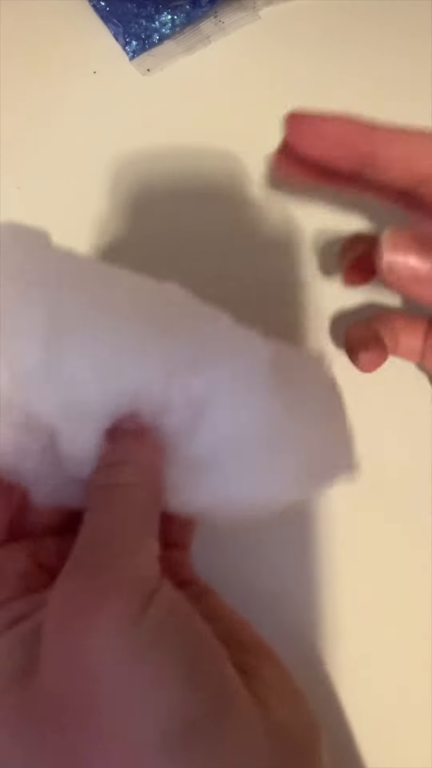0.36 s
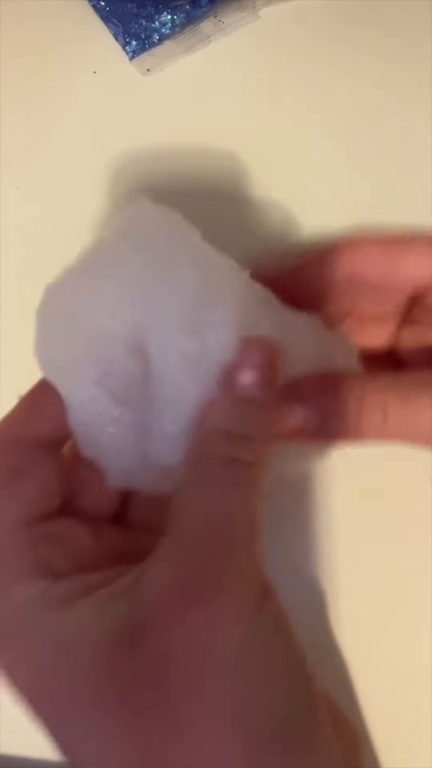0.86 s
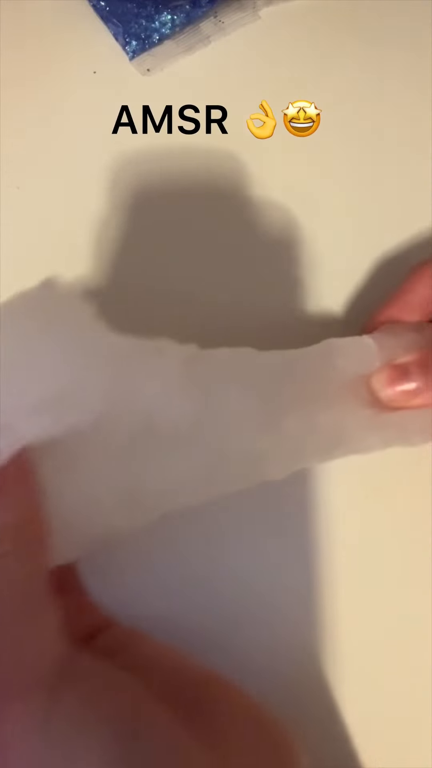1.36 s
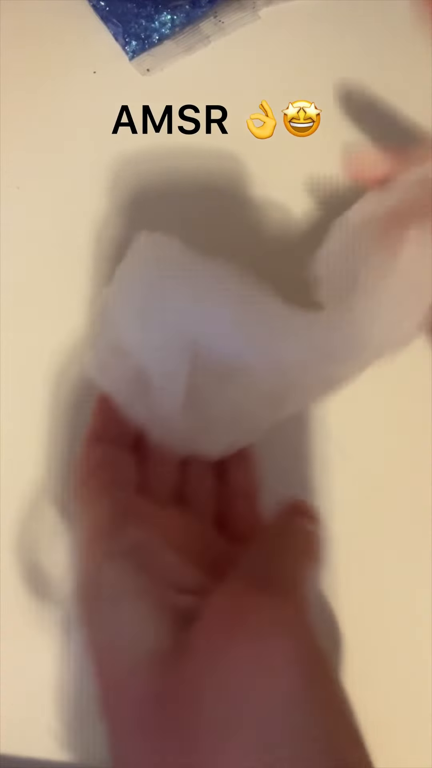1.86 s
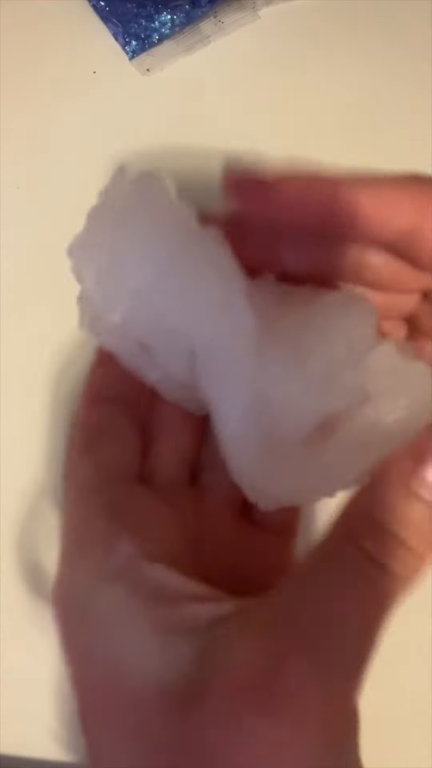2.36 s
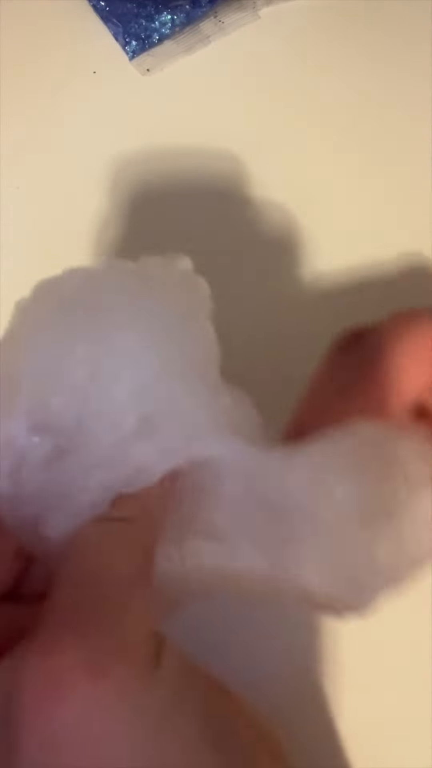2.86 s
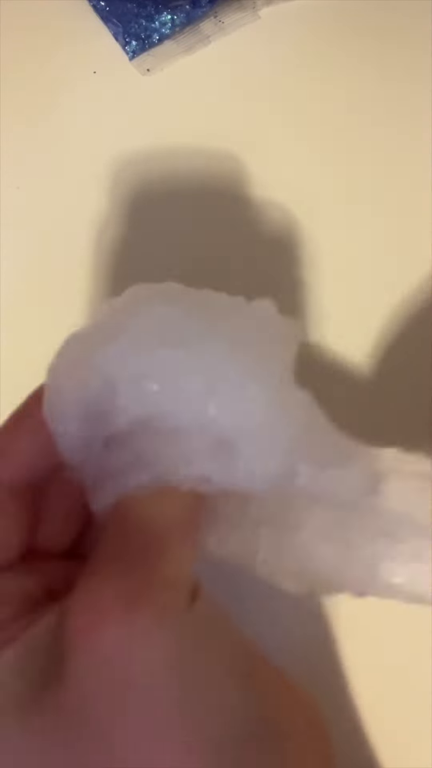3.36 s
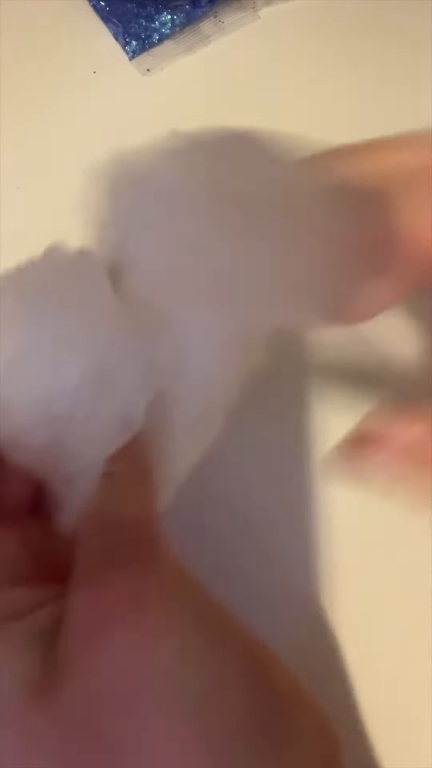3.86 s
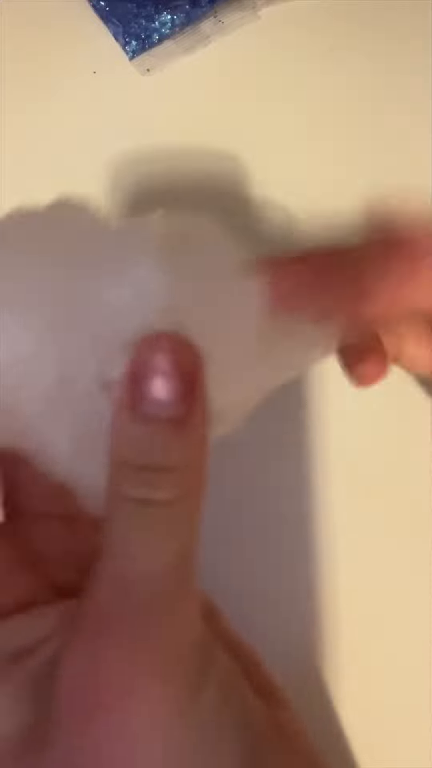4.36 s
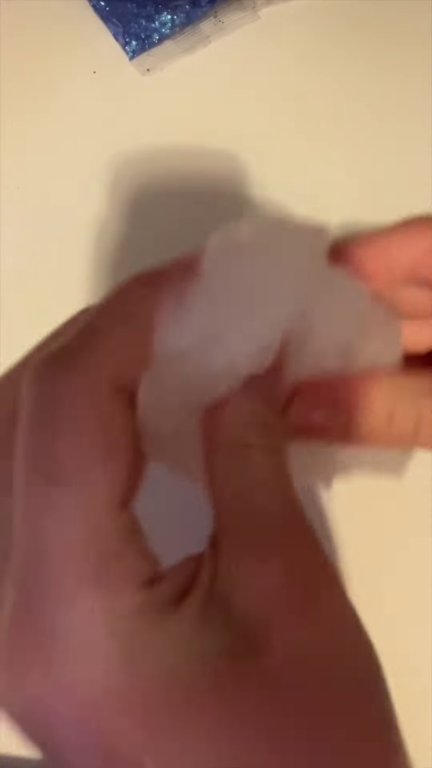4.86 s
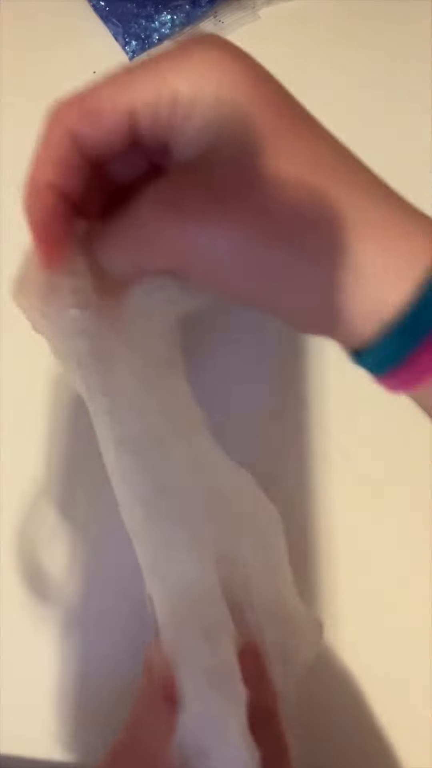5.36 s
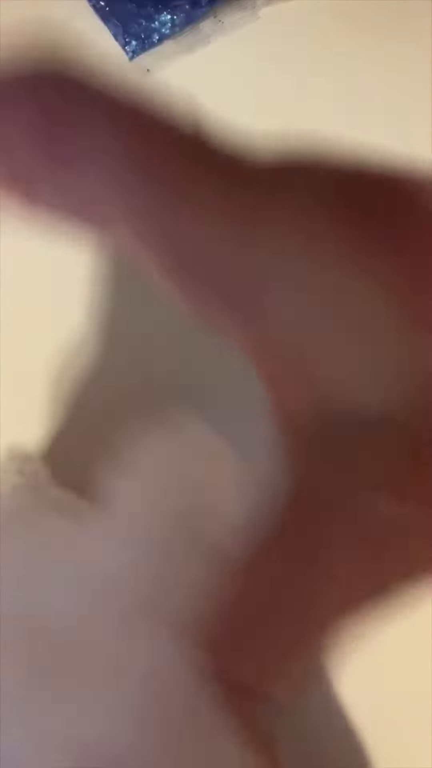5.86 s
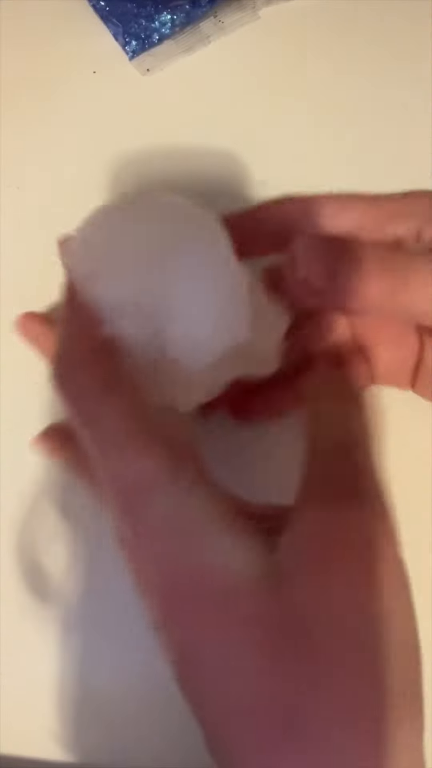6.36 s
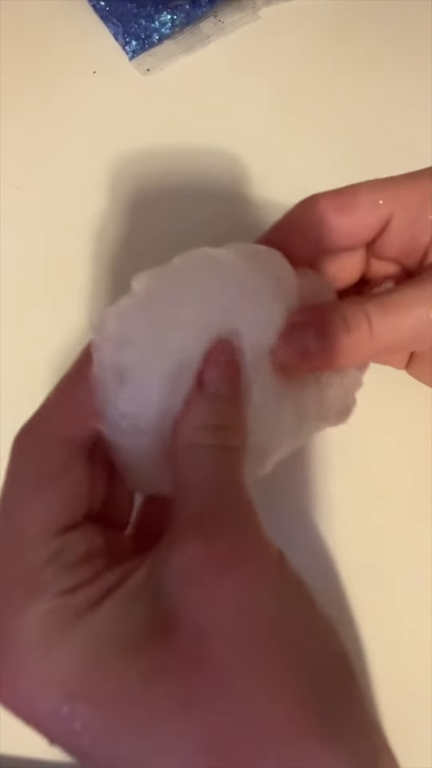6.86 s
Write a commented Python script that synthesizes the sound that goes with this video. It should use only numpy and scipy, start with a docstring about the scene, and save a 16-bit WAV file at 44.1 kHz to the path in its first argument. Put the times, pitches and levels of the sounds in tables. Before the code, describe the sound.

Close, dry and crisp: thin slime films snap brightly while trapped air pockets pop lower, each squeeze trailing a fine crackle. It starts scattered, becomes thick and continuous for about a second around three seconds, eases, swells again at five and dwindles to isolated clicks. Soft hand knocks on a table occur now and then, with a late tap and dull rumble. The small room is quiet, with a low hum and faint hiss.

```python
"""In a quiet room, two hands stretch and fold bubbly slime just above a table, close to a two-port microphone.
Thin films snap brightly and trapped air pockets pop lower: short tones at listed pitches, torn by noise.
A fine crackle of random clicks, rung by films and pockets alike, follows each squeeze of the lump.
Now and then a hand knocks the table and rings its modes; once a nail taps and the table shudders.
A swelling hum, a steady rumble and faint hiss lie behind, made of a wavering sine and shaped noise."""
import sys
import numpy as np
from scipy import signal
from scipy.fft import rfft, irfft, next_fast_len
from scipy.io import wavfile

SR = 44100
rng = np.random.default_rng(int(sys.argv[2]) if len(sys.argv) > 2 else 0)


def gain_from_db(level_db):
    """Turn a decibel level (scalar or array-like) into a linear amplitude factor."""
    decades = np.asarray(level_db, float) / 20
    return 10 ** decades


def transcribe(u):
    """Save the signal u as a 16-bit wav file named by the first command-line argument.

    u: samples, shape (n,) or (channels, n), limited to [-1, 1]; the rate is SR.
    q: integer samples, one column per channel.
    """
    v = np.clip(np.atleast_2d(u).T, -1, 1)
    q = np.round(v * 32767).astype(np.int16)
    wavfile.write(sys.argv[1], SR, q)


N = 308259   # length in samples

OPPOSITE = np.array([[1], [-1]])   # left and right in opposite sense
TABLE_UNLIKE = 0.4   # share of the table's motion that differs between the ports


def rms_one(x):
    """Scale to rms 1."""
    return x / np.sqrt(np.mean(x ** 2) + 1e-20)


def at_hz(points, hz):
    """Read a spectrum of (Hz, value) points on a log-frequency axis."""
    point_hz, values = np.array(points).T
    return np.interp(np.log(hz), np.log(point_hz), values)


def coloured(x, spectrum):
    """Shape the last axis by a spectrum of (Hz, gain dB) points."""
    length = x.shape[-1]
    size = next_fast_len(length)
    hz = np.maximum(np.fft.rfftfreq(size, 1 / SR), 1)
    return irfft(rfft(x, size) * gain_from_db(at_hz(spectrum, hz)), size)[..., :length]


def filtered(x, order, hz, kind="low"):
    """Butterworth filter."""
    return signal.sosfilt(signal.butter(order, hz, kind, fs=SR, output="sos"), x)


def drift(rate_hz):
    """Slow random wandering of rms 1: noise at 200 knots a second through a one-pole lowpass."""
    knots = rng.standard_normal(int(N / SR * 200) + 2)
    memory = np.exp(-2 * np.pi * rate_hz / 200)
    slow = rms_one(signal.lfilter([1], [1, -memory], knots))
    return np.interp(np.arange(N) * 200 / SR, np.arange(len(slow)), slow)


def ring(drive, hz, t60_s):
    """A two-pole resonance: a unit click sets a dying sine of starting height 1 ringing."""
    radius = gain_from_db(-60 / (t60_s * SR))
    angle = 2 * np.pi * min(hz, .45 * SR) / SR
    return signal.lfilter([0, np.sin(angle)], [1, -2 * radius * np.cos(angle), radius ** 2], drive + 1e-18)


def holds(rows, rise_db_per_s, fall_db_per_s):
    """Level in dB of gestures (start s, hold s, dB) that build, hold and die away; their powers add."""
    t = np.arange(0, N + 64, 64) / SR
    power = 1e-20
    for start_s, hold_s, db in rows:
        early = np.maximum(start_s - t, 0)
        late = np.maximum(t - start_s - hold_s, 0)
        power = power + gain_from_db(db - rise_db_per_s * early - fall_db_per_s * late) ** 2
    return np.interp(np.arange(N) / SR, t, 10 * np.log10(power))


def unlike(x):
    """The left-right difference: only the part below 6.6 kHz, in opposite sense; above it both sides stay
    alike."""
    return filtered(x, 6, 6600) * OPPOSITE


def room_tone():
    """A wavering hum that swells, coloured rumble partly shared by both ports, and faint hiss."""
    # swells of the hum: start_s (of the hold), hold_s, level_db (rms, before the waver)
    swells = [(0.0, 0.032, -80), (1.75, 0.31, -68), (1.85, 0.027, -61.5), (2.45, 0.81, -67.5),
              (6.62, 0.19, -69.5)]
    # colour of the rumble: frequency_hz, gain_db (relative)
    rumble_colour = [(15, -56), (25, -8.5), (60, 6), (124, 3), (165, -7.5), (345, -15.5), (619, -24),
                     (900, -35), (1170, -41.5), (1980, -120)]
    rumble_db, hiss_db, wide_hiss_db = -77.5, -74, -71   # both hiss levels are of the noise before shaping

    hum_hz = 74.5 + 1.5 * drift(14.0)
    waver = gain_from_db(2.0 * drift(4.6))
    hum = np.sqrt(2) * np.sin(2 * np.pi * np.cumsum(hum_hz) / SR) * waver
    hum_db = holds(swells, rise_db_per_s=120, fall_db_per_s=120)

    mid, side = coloured(rng.standard_normal((2, N)), rumble_colour)
    upper = filtered(mid, 4, [90, 300], "band")
    rumble = (mid + 0.63 * side * OPPOSITE) / np.std(upper)   # the level counts the shared part in 90-300 Hz

    white = rng.standard_normal((2, N))
    bright = coloured(white[0], [(1000, -13.0), (5000, -9.0), (11000, -5.5), (15500, -3.5), (16300, -34.0)])
    wide = unlike(filtered(white[1], 2, 700, "high"))
    return gain_from_db(hum_db) * hum + gain_from_db(rumble_db) * rumble + gain_from_db(hiss_db) * bright + gain_from_db(wide_hiss_db) * wide


def shudder():
    """After the last knock the low table resonances tremble unevenly, driven by the noise of a rough drag."""
    # low resonances of the table: frequency_hz, t60_s, level_db (relative rms)
    peaks = [(42, .25, -8), (70, .3, 0), (114, .3, -8), (185, .12, -22), (229, 2.5, -17), (330, .1, -26),
             (540, .05, -34)]
    shared_and_own = rng.standard_normal((len(peaks), 3, N))
    drag = shared_and_own[:, :1] + TABLE_UNLIKE * shared_and_own[:, 1:]
    out = sum(gain_from_db(db) * rms_one(ring(x, hz, t60_s)) for (hz, t60_s, db), x in zip(peaks, drag))
    # start s, hold s, rms dB
    level_db = holds([(6.25, 0.281, -55.5)], rise_db_per_s=499.5, fall_db_per_s=499.5)
    return gain_from_db(level_db) * rms_one(out)


def tap():
    """A nail taps something small: a click rings very briefly, and a noise-driven rattle rings on."""
    tap_s, tap_hz, rattle_t60_s = 6.2262, 950, 0.19
    t = np.maximum(np.arange(N) / SR - tap_s, 0)
    fade = gain_from_db(-10 - 60 * t / rattle_t60_s) * (t > 0)
    rattle = rms_one(ring(rng.standard_normal(N), tap_hz, .04)) * fade
    click = 1.0 * (np.arange(N) == round(tap_s * SR))
    return gain_from_db(-43) * (ring(click, tap_hz, .008) + rattle)


def knocks():
    """Fingertip, palm and a slap of skin set the table modes ringing; long contact is dull."""
    # hand on table: start_s, level_db (of the force), contact_s
    touches = [(0.717, -44, 0.00098), (1.809, -49.5, 0.0041), (3.96, -52.5, 0.0056), (6.223, -55, 0.0033)]
    # modes of the table top: frequency_hz, level_db (relative), t60_s
    modes = [(128, -7.5, 0.14), (178.2, -7, 0.074), (348, -3.5, 0.11), (380, -7.5, 0.23), (490, -6, 0.0501),
             (735, -9.5, 0.04)]
    fingertip_db, palm_late_s = -7, .008   # the fingertip lands before the palm
    slap_db, slap_t60_s = -26.5, 0.13   # noise of the skin
    thud_db = 3   # the force heard directly, beside the modes

    force = np.zeros(N + SR)
    t = np.arange(8192) / SR
    for (start_s, db, contact_s), noise in zip(touches, rng.standard_normal((len(touches), len(t)))):
        hits = gain_from_db(slap_db - 60 * t / slap_t60_s) * noise
        hits[0] += gain_from_db(fingertip_db)
        hits[round(palm_late_s * SR)] -= 1
        push = np.hanning(max(round(contact_s * SR), 4))
        at = round(start_s * SR)
        force[at:at + len(t)] += gain_from_db(db) * np.convolve(hits, 2 * push / push.sum())[:len(t)]
    force = force[:N]

    out = gain_from_db(thud_db) * force
    for k, (hz, mode_db, t60_s) in enumerate(modes):
        side = 1 + TABLE_UNLIKE * (-1) ** k * OPPOSITE   # modes lean left and right by turns
        out = out + gain_from_db(mode_db) * side * ring(force, hz, t60_s)
    return filtered(out, 3, 60, "high")


def rasps(count, size):
    """Rows of stereo noise, partly different at the ports as bubbles lie all over the lump."""
    mid, side = rng.standard_normal((2, count, 1, size))
    deep = filtered(side, 2, 800)   # the deep part differs most, the treble least
    return mid + 0.37 * unlike(side) + (0.13 * side + deep) * OPPOSITE


def scattered(count, scatter_db):
    """Left and right gains of bubbles at random places."""
    return gain_from_db(scatter_db * rng.uniform(-0.9, 1, (count, 1, 1)) * OPPOSITE)


def bursts(events, spectrum, cycles, tear_db, tear_t60, after_db, after_t60, scatter_db):
    """Each burst rings briefly at its own pitch, with a wide tearing click and a spray of tiny after-bursts."""
    out = np.zeros((2, N + 2048))
    t = np.arange(1024) / SR
    noise = rms_one(coloured(rasps(count=len(events), size=len(t)), spectrum))
    places = scattered(len(events), scatter_db)
    for (fullest_s, db, hz), spray, place in zip(events, noise, places):
        rise = t * hz / cycles   # 1 where the ring is fullest
        tone = np.sin(2 * np.pi * hz * t) * (rise * np.exp(1 - rise)) ** 2
        tear = gain_from_db(tear_db - 60 * t / tear_t60) * (rise > .5)
        after = gain_from_db(after_db - 60 * t / after_t60) * np.minimum(rise, 1)
        wave = tone + spray * (tear + after)
        at = max(round((fullest_s - cycles / hz) * SR), 0)
        out[:, at:at + len(t)] += gain_from_db(db) * place * wave / np.max(np.abs(wave))
    return out[:, :N]


def small_bubbles(per_s, uneven_db, clump_db, clump_rate):
    """Small bubbles burst as clicks at random moments, in clumps, few large and many tiny."""
    sizes = gain_from_db(uneven_db * np.minimum(rng.exponential(1, N), 4)) * rng.choice([-1, 1], N)
    chance = per_s * gain_from_db(clump_db * drift(clump_rate)) / SR
    return sizes * (rng.random(N) < chance)


def kneading():
    """Film and pocket crackle levels in dB: every squeeze over the faint tick of the lump left alone."""
    # squeezes and pulls: start_s (of the hold), hold_s, film_crackle_db, pocket_over_film_db
    squeezes = [(0.0, 0.013, -52.5, 1), (0.241, 0.1, -72, -9.5), (0.598, 0.011, -54, 6.5),
                (0.704, 0.0061, -62.5, 6), (0.89, 0.087, -68.5, 2), (1.089, 0.11, -64.5, -6.5),
                (1.371, 0.013, -62, -4), (1.519, 0.07, -63.5, -4), (1.758, 0.074, -54.5, -1),
                (2.019, 0.0083, -74.5, -0.5), (2.507, 0.096, -58.5, -0.5), (2.674, 0.083, -54, -4.5),
                (2.83, 0.26, -47.5, 3.5), (3.13, 0.036, -57, 7), (3.306, 0.25, -51.5, 0.5),
                (3.679, 0.05, -51.5, -2.5), (3.828, 0.14, -52.5, -1.5), (4.246, 0.02, -56, -1.5),
                (4.402, 0.0035, -56, 3), (4.718, 0.0057, -69.5, -1), (4.849, 0.0068, -62, 1.5),
                (4.942, 0.22, -56.5, 3), (5.242, 0.035, -48, 1.5), (5.277, 0.2, -53, 1),
                (5.647, 0.012, -50, -1.5), (5.729, 0.14, -65.5, -0.5), (6.095, 0.063, -64, -1),
                (6.225, 0.077, -68.5, 2), (6.862, .02, -76, -7), (6.98, .02, -69.5, -1.5)]
    grip_db_per_s, settle_db_per_s = 153, 218.5   # how fast film crackle builds before a hold and dies after
    steeper = 1.37   # pockets need more force, so they build and die faster than films
    resting = [(0, N / SR, -89)]
    film = [(s, hold_s, db) for s, hold_s, db, _ in squeezes] + resting
    pocket = [(s, hold_s, db + over_db) for s, hold_s, db, over_db in squeezes] + resting
    film_db = holds(film, grip_db_per_s, settle_db_per_s)
    pocket_db = holds(pocket, grip_db_per_s * steeper, settle_db_per_s * steeper)
    return film_db, pocket_db


def crackle(clicks, level_db, spectrum, low_hz, high_hz, t60, tone_db, strength_db, scatter_db):
    """Clicks are dealt to bubbles of thirty sizes, each a dying tone in a rasp, with its own strength."""
    t = np.arange(768) / SR
    dealt = rng.integers(0, 30, N)
    hz = np.geomspace(low_hz, high_hz, 30)[:, None, None]
    shapes = rasps(count=30, size=len(t)) + gain_from_db(tone_db) * np.sin(2 * np.pi * hz * t)
    strengths = strength_db * rng.uniform(0.17, 1, (30, 1, 1))
    shapes *= gain_from_db(-60 * t / t60 + strengths) * scattered(len(shapes), scatter_db)
    out = np.zeros((2, N))
    for k, shape in enumerate(shapes):
        out += signal.oaconvolve((clicks * (dealt == k))[None], shape, axes=1)[:, :N]
    return gain_from_db(level_db) * rms_one(coloured(out, spectrum))


def slime():
    """Loud single bursts over the fine crackle, whose every bubble sounds both film and pocket."""
    # bursting films: fullest_s, level_db (peak before placing and filtering), ring_hz
    snap_rows = [(0.0876, -31.5, 12900), (0.1465, -36.5, 10600), (0.2669, -45, 9700), (0.315, -43.5, 8000),
                 (0.359, -51, 10300), (0.5517, -30, 9500), (0.582, -28.5, 12000), (0.6884, -29, 14200),
                 (0.759, -44, 9200), (0.8883, -3, 9240), (0.9793, -24.5, 10500), (1.2529, -39, 9500),
                 (1.2857, -40.5, 8000), (1.3626, -34, 6600), (1.4588, -34.5, 9800), (1.5119, -36.5, 8750),
                 (1.5369, -26, 5430), (1.7432, -29.5, 8500), (1.7939, -24, 10700), (1.8582, -35, 10200),
                 (1.9, -36, 13300), (1.993, -50, 14800), (2.044, -44, 10440), (2.2, -58, 12150),
                 (2.244, -51.5, 10060), (2.31, -57, 6600), (2.3967, -56.5, 9570), (2.4466, -42.5, 6620),
                 (2.475, -33.5, 9400), (2.5106, -4, 7230), (2.5755, -22, 9470), (2.7339, -25, 9900),
                 (2.7867, -26, 9300), (2.8393, -19, 6540), (2.8442, -28, 9300), (2.8641, -19, 5550),
                 (2.9248, -25, 7100), (2.9497, -23.5, 8800), (2.9677, -19.5, 6700), (2.9783, -15.5, 6000),
                 (2.9828, -22, 7900), (2.9967, -22, 10100), (3.0446, -19, 6670), (3.0628, -32.5, 7000),
                 (3.0674, -23.5, 7000), (3.0817, -17, 12500), (3.1419, -30.5, 7940), (3.1594, -27, 9600),
                 (3.2492, -25, 5240), (3.2632, -24.5, 7700), (3.3138, -22.5, 6600), (3.321, -19.5, 8000),
                 (3.3432, -24, 6760), (3.373, -17, 6600), (3.3902, -19, 7300), (3.4024, -16.5, 11500),
                 (3.4282, -20, 10900), (3.4483, -29.5, 6900), (3.4596, -20.5, 7860), (3.5036, -10.5, 8200),
                 (3.5089, -9.5, 11200), (3.583, -30, 10800), (3.6004, -23.5, 7150), (3.6241, -28.5, 8660),
                 (3.779, -39, 9470), (3.901, -29, 10500), (3.9197, -23, 15700), (4.0941, -34, 9450),
                 (4.108, -38, 9900), (4.1676, -30, 11200), (4.2682, -36, 13900), (4.3899, -25.5, 13300),
                 (4.394, -24.5, 9300), (4.4421, -38.5, 13030), (4.7596, -32.5, 10230), (4.8791, -37, 6800),
                 (4.8912, -33.5, 13200), (4.9335, -28, 15100), (4.9892, -23.5, 10850),
                 (5.006, -23.5, 11100), (5.0122, -21, 15100), (5.0623, -13.5, 9150), (5.0953, -23, 9200),
                 (5.1316, -23.5, 9600), (5.1538, -23, 7500), (5.2062, -18, 9600), (5.2115, -13, 13100),
                 (5.2493, -22, 8100), (5.2706, -27.5, 9000), (5.3221, -10, 10200), (5.3296, -15, 10600),
                 (5.335, -33.5, 10000), (5.3567, -23, 9300), (5.4839, -23.5, 8600), (5.5442, -31.5, 8660),
                 (5.943, -43, 7200), (6.0842, -34.5, 8200), (6.1631, -32.5, 15400), (6.1767, -34.5, 6360),
                 (6.2259, -32.5, 9450), (6.3077, -37, 13850), (6.318, -46.5, 10900), (6.611, -50.5, 11900),
                 (6.64, -47.5, 10880), (6.8391, -34, 15730), (6.9085, -27, 14380)]
    # collapsing air pockets: fullest_s, level_db (peak before placing and filtering), ring_hz
    pop_rows = [(0.0325, -55, 4220), (0.1467, -48.5, 4000), (0.465, -50.5, 2520), (0.8303, -45, 1840),
                (0.8895, -42.5, 726), (0.9796, -40.5, 1900), (1.0276, -47.5, 1860), (1.2926, -47, 1870),
                (1.3629, -44.5, 3600), (1.4606, -44.5, 2790), (1.5124, -41, 2650), (1.5378, -35.5, 3790),
                (1.8525, -38, 2560), (1.9003, -43, 2240), (2.0446, -51.5, 2100), (2.1991, -56.5, 2450),
                (2.4706, -38.5, 4190), (2.4925, -42, 2340), (2.5107, -25, 4200), (2.7343, -31.5, 4230),
                (2.7492, -34, 1940), (2.8396, -26, 1530), (2.849, -28.5, 1920), (2.8643, -34.5, 4000),
                (2.8819, -30, 2200), (2.886, -48, 400), (2.8963, -36, 2280), (2.9013, -33.5, 4100),
                (2.9505, -27, 2400), (2.9783, -17, 2260), (3.0449, -22, 2020), (3.0756, -25, 3040),
                (3.082, -28, 4200), (3.1454, -26, 3610), (3.2275, -38, 2130), (3.3142, -26.5, 4600),
                (3.3214, -28, 4050), (3.3438, -30.5, 2130), (3.3734, -21, 2050), (3.3906, -25.5, 4330),
                (3.4487, -19.5, 2350), (3.4551, -21, 1980), (3.4857, -27.5, 2260), (3.5186, -30.5, 2120),
                (3.6011, -28, 4060), (3.7097, -37.5, 3900), (3.7793, -38.5, 1750), (3.918, -36.5, 2150),
                (3.927, -59, 430), (3.937, -35, 1540), (3.956, -35, 1990), (4.038, -48.5, 1520),
                (4.169, -51, 1210), (4.2328, -43, 2150), (4.279, -56, 656), (4.355, -47, 865),
                (4.3923, -30, 1580), (4.405, -51.5, 400), (4.409, -39, 1430), (4.724, -60, 674),
                (4.8208, -37, 3970), (5.0123, -32, 2700), (5.0627, -26.5, 2670), (5.1015, -24.5, 2600),
                (5.1319, -29, 4220), (5.1542, -29, 2260), (5.2075, -24.5, 3180), (5.2152, -21, 1890),
                (5.2501, -23.5, 4420), (5.271, -24.5, 2370), (5.3222, -20.5, 4410), (5.3353, -22.5, 2900),
                (5.3571, -25.5, 2840), (5.4854, -25.5, 2880), (5.4913, -26.5, 2980), (5.9433, -50, 1690),
                (6.0845, -31, 3780), (6.1345, -41, 3800), (6.2267, -41, 1900), (6.31, -58, 950)]
    # colour of film noise and crackle: frequency_hz, gain_db (relative)
    film_colour = [(1200, -43), (3000, -15.5), (5200, -4), (7000, -1), (10300, 1.5), (12500, -7),
                   (15700, -2.5), (16300, -22)]
    # colour of pocket noise and crackle: frequency_hz, gain_db (relative)
    pocket_colour = [(300, -22.5), (900, -24.5), (1250, -11), (2060, -6), (3350, -8), (4050, -2),
                     (5200, -1.5), (8000, -39.5)]
    film_scatter_db, pocket_scatter_db = 0.56, 5   # how far bubbles lie to the left or right

    film_db, pocket_db = kneading()
    snaps = bursts(snap_rows, film_colour, cycles=1.3, tear_db=-6, tear_t60=.004,
                   after_db=-24, after_t60=.02, scatter_db=film_scatter_db)
    pops = bursts(pop_rows, pocket_colour, cycles=1.4, tear_db=-13.5, tear_t60=0.011,
                  after_db=-12.0, after_t60=0.06, scatter_db=pocket_scatter_db)
    clicks = small_bubbles(per_s=900.0, uneven_db=4.0, clump_db=3.0, clump_rate=20.0)
    films = crackle(clicks, film_db, film_colour, 5500, 15500, t60=0.015,
                    tone_db=-3, strength_db=4.5, scatter_db=film_scatter_db)
    pockets = crackle(clicks, pocket_db, pocket_colour, 502, 4500, t60=0.022,
                      tone_db=-1, strength_db=5.5, scatter_db=pocket_scatter_db)
    # bubbles this small send out no bass
    thin = filtered(snaps, 2, 1500, "high")
    loud = filtered(thin + pops, 2, 280, "high")
    return loud + films + pockets


def echoes(x):
    """Scattered reflections as dying noise, partly different at the two ports."""
    # table, then room: level_db, t60_s
    reflections = [(-21, .06), (-24, .25)]
    t = np.arange(round(.4 * SR)) / SR
    shared, own = rng.standard_normal((2, len(t)))
    decay = 0
    for db, t60_s in reflections:
        decay = decay + gain_from_db(db - 60 * t / t60_s) / np.sqrt(t60_s * SR / np.log(1e6))
    late = t > .002   # path by way of the nearest surface
    return signal.fftconvolve(x.mean(axis=0)[None], (shared + unlike(own)) * decay * late, axes=1)[:, :N]


def ports(x):
    """The two microphone ports hear the near source with a level and phase offset that depend on pitch."""
    # nearly a full turn, most of it between 4 and 7 kHz: frequency_hz, left_lead_rad
    port_phase = [(1000, -.3), (3700, -.4), (4800, -2.3), (5500, -4.3), (6500, -5.6), (7600, -6.1),
                  (11000, -6.2)]
    # frequency_hz, left_minus_right_db
    port_balance = [(500, -2), (2000, -2), (3100, -1), (4200, -3.5), (5500, -0.5), (9000, -0.3)]
    size = next_fast_len(N)
    hz = np.maximum(np.fft.rfftfreq(size, 1 / SR), 1)
    # each port takes half the offset
    half = gain_from_db(at_hz(port_balance, hz) / 2) * np.exp(.5j * at_hz(port_phase, hz))
    return irfft(rfft(x, size) * [half, 1 / half], size)[:, :N]


def scene():
    """Slime, knocks and tap, direct and reflected, over the shudder and the room tone."""
    near = slime() + knocks() + tap()
    return ports(near) + echoes(near) + shudder() + room_tone()


def roll_off(x):
    """The treble ends steeply here."""
    return signal.sosfilt(signal.butter(12, 17150, fs=SR, output="sos"), x)


def record(dry):
    """A steep lowpass cuts the top, with 50 dB of rejection from 17.2 kHz up."""
    dull = signal.sosfilt(signal.cheby2(10, 50, 17200, fs=SR, output="sos"), dry)
    return roll_off(dull)


dry = scene()
out = record(dry)
transcribe(out)
```